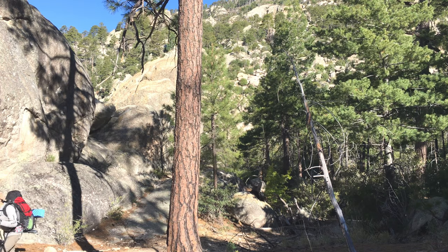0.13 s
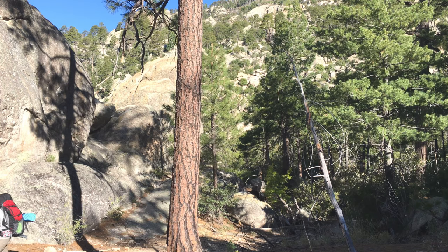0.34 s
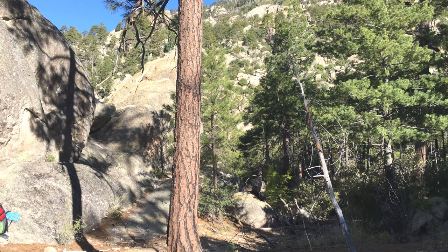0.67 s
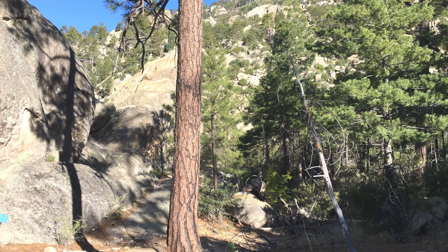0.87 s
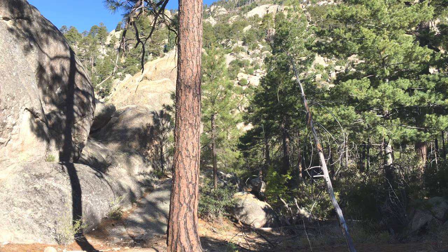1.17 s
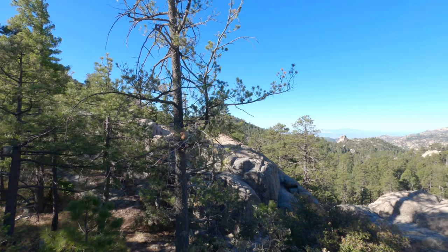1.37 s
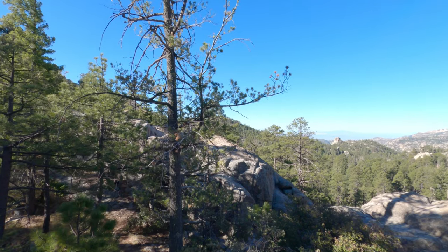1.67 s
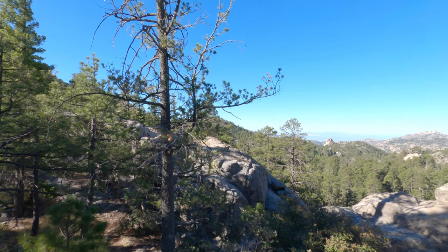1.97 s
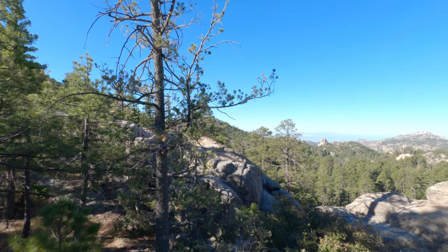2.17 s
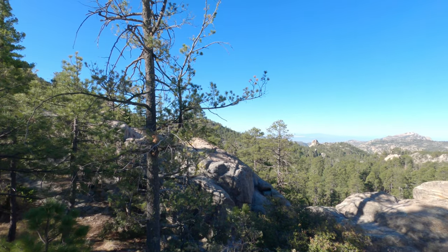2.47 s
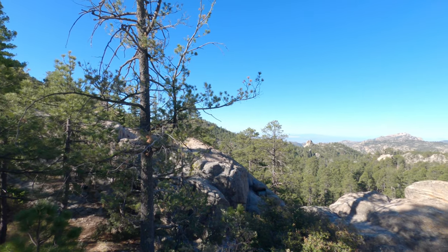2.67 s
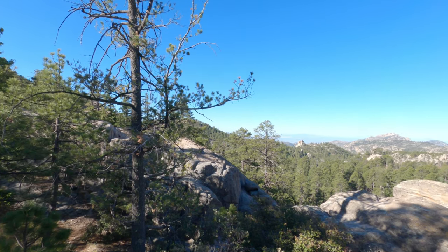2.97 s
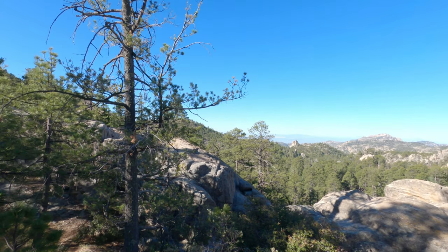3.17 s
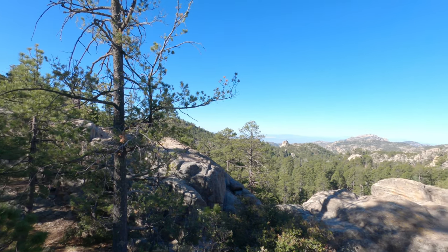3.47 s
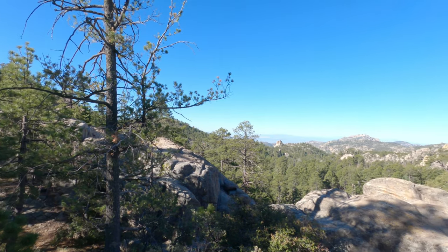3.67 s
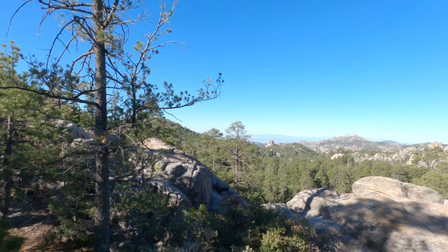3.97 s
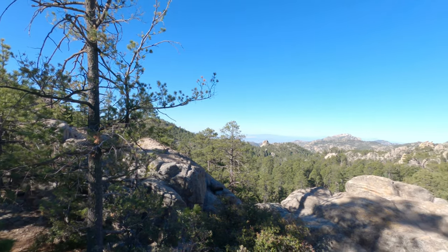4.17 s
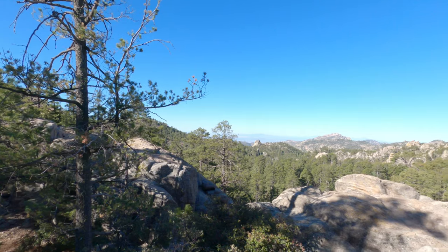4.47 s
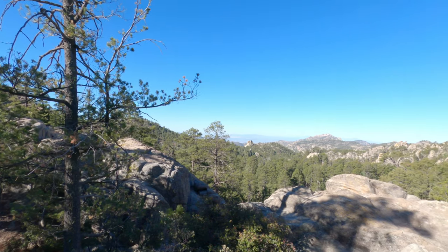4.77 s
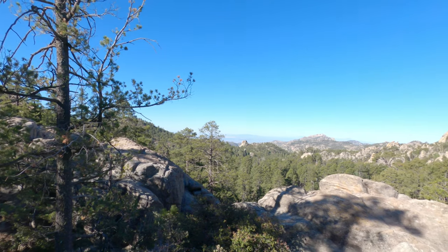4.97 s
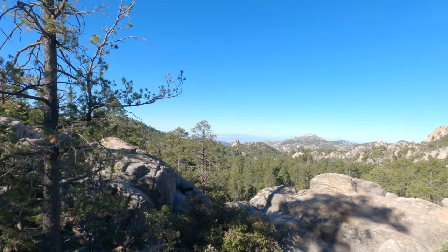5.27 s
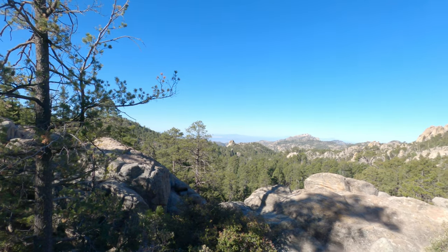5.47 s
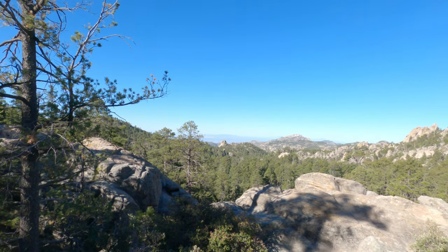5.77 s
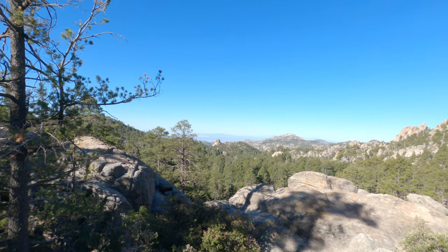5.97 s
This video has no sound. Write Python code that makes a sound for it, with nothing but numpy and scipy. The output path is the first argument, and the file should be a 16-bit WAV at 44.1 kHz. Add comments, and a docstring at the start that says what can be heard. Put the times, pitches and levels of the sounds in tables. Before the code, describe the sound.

A hand-held outdoor microphone catches soft grit crunching underfoot, small pebble snaps, rumbling bumps and breezy hiss for just over a second. The background then drops abruptly to a soft, dull canyon hush. Over it a small bird sings a long descending run of almost pure whistles, quick and high at first, later slower, lower and deeply scooped, finished by a quiet rough buzz. Rocks give quick echoes and a very faint tail.

```python
"""On a gritty trail two steps crunch and low bumps shake the hand-held microphone, then a cut to quieter canyon air.
A canyon wren whistles a long cascade of scooped notes, tones that drop, slide down and hook up; the notes
slow and sink in pitch, and the song ends on a nasal buzz of pulses. Thin slurs come from a far bird.
Rock echoes, pine scatter and a faint wall tail surround the birds; shaped noise makes grit, rumble and breeze."""
import sys
import numpy as np
from scipy import signal
from scipy.fft import rfft, irfft, next_fast_len
from scipy.io import wavfile
from scipy.ndimage import uniform_filter1d

SR = 44100
rng = np.random.default_rng(int(sys.argv[2]) if len(sys.argv) > 2 else 0)


def wav_out(sig):
    """Save sig, one row per channel (or a flat mono array), as 16-bit PCM at SR to the path in sys.argv[1]."""
    wavfile.write(sys.argv[1], SR, np.round(np.clip(np.atleast_2d(sig).T, -1, 1) * 32767).astype(np.int16))


N = 270112
T = np.arange(N) / SR   # time axis, s

# Wren notes, level before the song fader: start_s, downward_slide_s, held_top_hz, level_db
WREN_NOTES = [(1.102, .013, 5670, -47), (1.165, .023, 5380, -32.5), (1.247, .030, 5050, -28),
              (1.351, .039, 4770, -25.3), (1.472, .046, 4610, -23.3), (1.608, .052, 4520, -20.7),
              (1.756, .059, 4470, -19.2), (1.915, .067, 4370, -20), (2.084, .071, 4310, -18),
              (2.264, .077, 4210, -17.8), (2.452, .079, 4120, -19.3), (2.648, .081, 4010, -20),
              (2.843, .086, 3925, -20), (3.044, .088, 3780, -20.3), (3.248, .096, 3695, -20.8),
              (3.465, .099, 3620, -18.5), (3.685, .105, 3550, -18.3), (3.917, .110, 3455, -19),
              (4.154, .122, 3355, -19.7), (4.403, .124, 3295, -21.3), (4.647, .105, 3305, -22),
              (4.878, .103, 3305, -23.3), (5.109, .105, 3305, -22), (5.349, .106, 3300, -23)]
# Scoop, deepening along the song: time_s, depth_below_top_hz
SCOOP_DEPTH = [(1.1, 400), (1.18, 600), (1.5, 590), (2.3, 865), (3.05, 820), (4.15, 880), (4.4, 970),
               (4.65, 1700), (5.35, 1790)]
# Shape of the slide: time_s, knee_height (share of scoop), mid_height (share of knee)
SLIDE_SHAPE = [(1.25, .2, .4), (1.4, .8, .3), (2.05, .95, .43), (2.75, .5, .9), (3.15, .55, .85),
               (3.7, .57, .53), (4.4, .6, .46), (5.35, .66, .39)]
# Voice weakening as it dips below the top: time_s, loss_db_per_hz
DIP_LOSS = [(1.1, 0), (1.8, .0008), (2.5, .0045), (3.4, .0085), (3.8, .012), (4.3, .0105), (4.65, .0135)]
# Upward hook with its held top: time_s, length_s
HOOK_LENGTH = [(1.1, .018), (1.26, .041), (2.3, .05), (4.3, .051), (4.65, .063), (5.35, .066)]
# Swell into each note: time_s, onset_level_db
ONSET_LEVEL = [(1.47, -13), (1.6, -8), (2.4, -7), (2.8, -11), (3.05, -7), (3.5, -8), (4.3, -9), (4.65, -5)]
# Throat and beak resonance during the buzz: pitch_hz, level_db
THROAT_SPECTRUM = [(1000, -59), (1520, -26.5), (2040, -20.5), (2530, -35), (3050, -13), (3560, -15),
                   (4080, -5.5), (4600, -9.5), (5100, 0), (5620, -8), (6120, -11.5), (6650, -13.5),
                   (7700, -26), (8600, -40)]
# Faint slurs of a far bird: start_s, length_s, from_hz, to_hz, level_db
FAR_SLURS = [(0.083, 0.04, 4700, 3600, -75), (0.236, .045, 4900, 3800, -73),
             (0.284, 0.029, 4370, 4950, -75), (0.35, .04, 4700, 3860, -69)]
# Echoes off nearby rock faces: delay_left_s, delay_right_s, level_db
ROCK_ECHOES = [(.0016, .0016, -26.5), (.005, 0.0032, -17), (.012, .0121, -17), (.0226, .0227, -20.5),
               (.0338, .0365, -29)]
# Left-right balance of the birds, positive to the left: time_s, balance_db
BIRD_BEARING = [(1.1, .6), (2.2, 1.8), (3.2, 3.1), (5.55, 3), (5.66, -.3)]
# Boots pressing and scuffing the grit: start_s, level_db, fade_to_1/e_s
BOOT_SCUFFS = [(0, -58.5, .16), (.37, -46.5, .05), (.415, -49.5, .02), (.465, -51, .1), (.855, -54, .27),
               (1.055, -54.5, .05), (1.2, -58, .3)]
# Pebbles and twigs that snap, before the snap trim: start_s, level_db
PEBBLE_SNAPS = [(0.387, -37), (.428, -53), (.473, -51), (.49, -60), (0.561, -41), (0.861, -36.5),
                (1.061, -39), (1.071, -39.5), (4.71, -44)]
# Relative spectrum of grit: pitch_hz, level_db (per hz)
GRIT_SPECTRUM = [(150, -8.5), (330, 3), (800, 0.5), (1900, -2), (2900, -7.5), (4400, -15.5), (5800, -8.5),
                 (8000, -20), (10000, -19), (15000, -24.5)]
# Low bumps on the microphone, before gain and filter: middle_s, level_db, pitch_hz
MIC_BUMPS = [(.152, -26, 63), (0.185, -30.5, 120), (.278, -41, 74.5), (.356, -33.5, 130),
             (.474, -27.5, 63.3), (.547, -28.5, 139), (0.554, -20.5, 67), (.651, -21, 60),
             (0.77, -31, 67.5), (0.79, -30.5, 134), (0.847, -29, 60), (0.885, -26.5, 91),
             (0.973, -22.5, 113), (.991, -19.5, 60), (1.068, -26.5, 75.6), (1.141, -36.5, 71),
             (1.212, -45, 93), (1.351, -37, 55)]
# Hand shifting on the microphone: middle_s, half_length_s, level_db
GRIP_SHIFTS = [(2.55, .055, -62), (3.0, .018, -63), (6.07, .05, -58)]
# Relative spectrum of the air on the trail: pitch_hz, level_db (per hz)
TRAIL_AIR_SPECTRUM = [(25, 15), (55, 26), (120, 8.5), (220, 5), (400, -2), (900, -3), (1500, -12.5),
                      (2500, -17), (4500, -15.5), (7000, -22.5), (10000, -22), (15500, -29)]
# Relative spectrum of the air over the canyon: pitch_hz, level_db (per hz)
CANYON_AIR_SPECTRUM = [(25, -2), (60, -1.5), (100, -19), (150, 6.5), (250, 3), (500, 0.5), (1200, 0),
                       (1900, -13.5), (3000, -22.5), (5000, -22.5), (7000, -28.5), (10000, -37),
                       (15000, -47)]
# Left-right likeness of the canyon air: pitch_hz, likeness (0 to 1)
AIR_LIKENESS = [(100, .4), (280, .48), (1000, .62), (4000, .8), (12000, .55)]
# Left-right balance of the canyon air, positive to the left: pitch_hz, balance_db
AIR_BALANCE = [(60, 0), (220, -1.5), (700, -.5), (1500, .3), (4000, .5), (9000, -.5), (15000, -3)]

ATTACK_S, RELEASE_S = .006, .016   # edges of each whistled note
BUZZ_HZ, BUZZ_DB = 511.5, -37   # pulse rate before bends, level at the crest before the buzz fader
BUZZ_START_S, BUZZ_CREST_S, BUZZ_BREAK_S, BUZZ_END_S = 5.664, 5.79, 5.88, 6.016
PORT_LAG_S = .000017   # the left microphone port hears the birds this much later
SCUFF_RISE_S = .018
CUT_S = 1.376   # middle of the cut from trail to canyon background
TRAIL_DB, CANYON_DB = -47, -61   # air levels
TRAIL_RUMBLE_DB, CANYON_RUMBLE_DB = -52, -85   # the canyon rumble lies under the trail rumble too
CUTOFF_HZ = 15700


def cascade(onset_hz=5250, least_drop_hz=300, crest_hz=80, knee_share=.18, mid_share=.56, dwell_share=.08,
            rise_s=.023, settle_s=.0068, knee_softness=.28, hold_fade_db=-4.5, strained_hz=2100, relaxed=-.4,
            overtones_floor_db=-2.2, turn_dip_db=-2.5, turn_dip_s=.013, strain_overtones_db=1.2,
            attack_overtones_db=7, hook_overtones_db=-9, bite_s=.04, waver=.0065, flutter_db=1.65):
    """Each note drops to a knee, slides to a turn and hooks up; returns pitch, amplitude, overtone boost (dB)."""
    pitch, level, overtones_db = np.full(N, 3000.), np.zeros(N), np.zeros(N)
    for start, fall, top_hz, db in WREN_NOTES:
        depth, = at_time(SCOOP_DEPTH, start)
        knee_height, mid_height = at_time(SLIDE_SHAPE, start)
        loss, = at_time(DIP_LOSS, start)
        onset_db, = at_time(ONSET_LEVEL, start)
        hook_s, = at_time(HOOK_LENGTH, start)
        turn = start + fall
        end = turn + hook_s
        knee, mid = start + knee_share * fall, start + mid_share * fall
        top = turn + min(rise_s, hook_s / 2)
        span = (T >= start) & (T < end)
        t = T[span]

        low_hz, knee_above = top_hz - depth, knee_height * depth
        drop_hz = max(onset_hz - low_hz - knee_above, least_drop_hz)
        drop = drop_hz * np.exp(-((t - start) / settle_s) ** 1.25)
        slide_times = [knee, mid, turn - dwell_share * fall]
        slide = np.interp(t, slide_times, [knee_above, mid_height * knee_above, 0])
        slide = uniform_filter1d(slide, size=300)
        rising = ease((t - turn) / (top - turn))
        held = np.clip((t - top) / (end - top), 0, 1)
        crest = crest_hz * (np.sin(np.pi * held) - .5 * rising)   # the held top arches over
        pitch[span] = low_hz + drop + slide + depth * rising ** 2 + crest

        # a long drop bites at the attack and tires on the hook; strain scales these dB settings
        strain = np.interp(drop_hz, [least_drop_hz, strained_hz], [relaxed, 1])
        bite_db = attack_overtones_db * np.exp(-(t - start) / bite_s)
        strained_db = strain_overtones_db + bite_db + hook_overtones_db * rising
        overtones_db[span] = overtones_floor_db + strain * strained_db

        swell_db = onset_db * np.interp(t, [start, knee, mid], [1, knee_softness, 0])
        dip_db = -loss * (depth - slide) * (1 - rising)
        # the voice eases off before it turns
        dip_db = dip_db + turn_dip_db * np.exp(-((t - turn) / turn_dip_s + 1) ** 2)
        edges = ease((t - start) / ATTACK_S) * ease((end - t) / RELEASE_S)
        level[span] = from_db(db + swell_db + dip_db + strain * hold_fade_db * held) * edges
    return pitch * (1 + waver * drift(120)), level * from_db(flutter_db * drift(47)), overtones_db


def whistle(pitch, level, overtones_db, overtone_flutter_db=3.8):
    """A nearly pure tone whose two overtones leak most on low pitches, varied by the boost and a flutter."""
    phase = 2 * np.pi * np.cumsum(pitch) / SR
    leak = from_db(overtones_db + overtone_flutter_db * drift(71))
    # each curve: pitch_hz, level_db
    second = from_db(at_hz([(1500, -3), (2000, -11), (2550, -25), (3200, -27.5), (3450, -38.5),
                            (3750, -41), (4400, -45), (5200, -54)], pitch))
    third = from_db(at_hz([(1500, -19), (2000, -31), (2350, -47), (2750, -60), (3400, -58),
                           (4200, -48), (5000, -64)], pitch))
    # the voice is a little weaker around 1900 Hz
    carry = from_db(at_hz([(1500, -1.5), (1900, -4.5), (2300, -1.5), (2700, -.5), (4500, 0), (5400, 1)], pitch))
    overtones = second * np.sin(2 * phase) + third * np.sin(3 * phase)
    return np.sqrt(2) * level * carry * (np.sin(phase) + leak * overtones)


def buzz_arch(scoop_hz=52, scoop_s=.024, sag_hz=34, collapse_hz=55, collapse_s=.013, swell_db=-5, sag_db=-2.5,
              attack_s=.012, release_s=.022, steady_rough=.37, broken_rough=.27, break_s=.03):
    """The buzz scoops up, roughens, sags and collapses; returns pulse rate, amplitude and roughness."""
    t = np.clip(T, BUZZ_START_S, BUZZ_END_S)
    since, left = t - BUZZ_START_S, BUZZ_END_S - t
    early = np.maximum((BUZZ_CREST_S - t) / (BUZZ_CREST_S - BUZZ_START_S), 0) ** 2
    sag = np.maximum((t - BUZZ_CREST_S) / (BUZZ_END_S - BUZZ_CREST_S), 0) ** 2
    scoop = scoop_hz * np.exp(-since / scoop_s)
    collapse = collapse_hz * np.exp(-left / collapse_s)
    rate = BUZZ_HZ - scoop - sag_hz * sag - collapse
    level = from_db(BUZZ_DB + swell_db * early + sag_db * sag) * ease(since / attack_s) * ease(left / release_s)
    return rate, level, steady_rough + broken_rough * ease((t - BUZZ_BREAK_S) / break_s)


def buzz(ripple_db=2.5, ripple_hz=62, jitter=.0089, shimmer_db=3.0, rasp_db=-8, partial_flutter_db=4.0,
         partial_slip=1.0, sweep=.13):
    """Each pulse of the syrinx is a tiny downward chirp with a puff of noise; roughness scales the unsteadiness."""
    rate, level, rough = buzz_arch()
    phase = 2 * np.pi * np.cumsum(rate * (1 + jitter * rough * drift(230))) / SR
    pulses = np.zeros(N)
    for k in range(2, 18):
        # high partials come first in each pulse
        lead = np.pi * sweep * k ** 2 + partial_slip * rough * drift(60)
        partial_db = at_hz(THROAT_SPECTRUM, k * rate) + partial_flutter_db * rough * drift(45)
        pulses += from_db(partial_db) * np.cos(k * phase + lead)
    pulses /= np.sqrt(uniform_filter1d(pulses ** 2, size=1200))   # even out the running level
    puffs = rng.standard_normal(N) * (1 + .5 * np.cos(phase))
    rasp = colour(puffs, [(1500, -47), (2800, -7), (4000, -19), (5200, 5), (6500, -13), (7700, -20),
                          (8600, -24), (10000, -28), (10700, -73)])
    # a 62 Hz ripple in loudness, as from overlapping echoes
    ripple = ripple_db * np.sin(2 * np.pi * ripple_hz * T + drift(15))
    unsteady = from_db(rough * (ripple + shimmer_db * drift(130)))
    return level * unsteady * (pulses + rough * from_db(rasp_db) * rasp)


def far_bird():
    """Thin whistles from far off, each a sine gliding between two pitches under a rounded swell."""
    out = np.zeros(N)
    for start, length, from_hz, to_hz, db in FAR_SLURS:
        u = np.clip((T - start) / length, 0, 1)
        phase = 2 * np.pi * np.cumsum(from_hz + (to_hz - from_hz) * u) / SR
        out += from_db(db) * np.sqrt(2) * np.sin(np.pi * u) ** 2 * np.sin(phase)
    return out


def scatter(x, delay_s, t60, side_db, echoes_per_s=1500):
    """A dying swarm of small random echoes; its middle part has unit energy, its side part sits at side_db."""
    t = T[:SR]
    fade = np.clip(t / delay_s - .5, 0, 1) * from_db(-60 * t / t60)
    echoes = rng.standard_normal((2, SR)) * (rng.random((2, SR)) < echoes_per_s / SR) * fade
    mid, side = echoes / np.sqrt(np.sum(echoes ** 2, axis=1, keepdims=True))
    response = mid + from_db(side_db) * side * [[1], [-1]]
    return signal.fftconvolve(x[None], response, axes=1)[:, :N]


def canyon(x, trees_db=-10.3, walls_db=-26):
    """Direct sound, quick echoes off nearby rock, scatter from the pines and a faint tail from the walls."""
    rocks = sum(from_db(db) * np.array([delayed(x, left_s), delayed(x, right_s)])
                for left_s, right_s, db in ROCK_ECHOES)
    trees = scatter(x, delay_s=.0054, t60=.2, side_db=-5, echoes_per_s=900)
    walls = scatter(x, delay_s=.045, t60=.55, side_db=-6, echoes_per_s=300)
    left, right = x + rocks + from_db(trees_db) * trees + from_db(walls_db) * walls
    # a phase tilt delays the left port by less than a sample
    lag = np.exp(-2j * np.pi * np.fft.rfftfreq(N, 1 / SR) * PORT_LAG_S)
    left = irfft(rfft(left) * lag, N)
    pan_db, = at_time(BIRD_BEARING, T)
    return np.array([left, right]) * from_db(pan_db * [[.5], [-.5]])


def tread():
    """Weight of the boots on the grit: each scuff comes on quickly and dies away; their powers add."""
    power = np.zeros(N)
    for start, db, fade_s in BOOT_SCUFFS:
        since = T - start
        fade = np.exp(-np.maximum(since - SCUFF_RISE_S, 0) / fade_s)
        power += (from_db(db) * ease(since / SCUFF_RISE_S) * fade) ** 2
    return np.sqrt(power) * (1 - after_cut())


def footsteps(grains_per_s=3500, size_db=4.0, snap_s=.0048, snap_db=-8):
    """Grit gives way in countless tiny slips under the boot, and a few pebbles snap as short noise bursts."""
    born = rng.random((2, N)) < grains_per_s / SR
    sizes = from_db(size_db * np.minimum(rng.exponential(1, (2, N)), 4))
    grains = born * rng.choice([-1, 1], (2, N)) * sizes
    snaps = sum(from_db(db + snap_db) * (T >= s) * np.exp(-np.abs(T - s) / snap_s) for s, db in PEBBLE_SNAPS)
    crunch = tread() * colour(ahead(grains), GRIT_SPECTRUM)
    return crunch + snaps * colour(ahead(rng.standard_normal((2, N))), GRIT_SPECTRUM)


def handling():
    """Strength of the hand's rumble: strong on the trail, very faint after the cut, with swells as the grip shifts."""
    shifts = sum(from_db(db) * np.exp(-((T - s) / half_s) ** 2) for s, half_s, db in GRIP_SHIFTS)
    return shifts + from_db(TRAIL_RUMBLE_DB) * (1 - after_cut()) + from_db(CANYON_RUMBLE_DB)


def bumps(cycles=.43, top_hz=360):
    """Heavily damped pushes and pulls of pressure over a soft rumble, the same in both channels."""
    swings = np.zeros(N)
    for middle, db, hz in MIC_BUMPS:
        t = T - middle
        damping = np.exp(-np.minimum(np.abs(t) * hz / cycles, 20))
        swings += -1.4 * from_db(db) * np.sin(2 * np.pi * hz * t) * damping
    rumble = colour(rng.standard_normal(N), [(15, -5.5), (40, -1), (70, -19), (150, -17), (500, -70.5)])
    band = signal.butter(2, [28, top_hz], "band", fs=SR, output="sos")
    return signal.sosfiltfilt(band, swings) + handling() * rumble


def air():
    """Breeze in the pines as shaped noise: rumbling and hissy on the trail, soft and dull over the canyon."""
    canyon_share = after_cut()
    trail = from_db(TRAIL_DB) * colour(ahead(rng.standard_normal((2, N))), TRAIL_AIR_SPECTRUM)
    overlook = from_db(CANYON_DB) * colour(widen(rng.standard_normal((2, N))), CANYON_AIR_SPECTRUM)
    return (1 - canyon_share) * trail + canyon_share * overlook


def after_cut():
    """0 before the cut, 1 after, with a 4 ms crossfade."""
    return np.clip((T - CUT_S) / .004 + .5, 0, 1)


def ahead(pair, side_db=-26):
    """Two unrelated signals become a sound straight ahead, nearly the same in both channels."""
    return pair[0] + from_db(side_db) * pair[1] * np.array([[1], [-1]])


def widen(pair):
    """Two unrelated signals become left and right in the open air, partly alike."""
    hz = np.fft.rfftfreq(N, 1 / SR)
    alike = np.clip(at_hz(AIR_LIKENESS, hz), 0, 1)
    mid, side = rfft(pair)
    sign = np.array([[1], [-1]])
    spread = np.sqrt(1 + alike) * mid + np.sqrt(1 - alike) * side * sign
    return irfft(spread * from_db(sign * at_hz(AIR_BALANCE, hz) / 2), N)


def delayed(x, seconds):
    """The same sound, later."""
    return np.interp(T - seconds, T, x, left=0)


def drift(rate):
    """Slow chance with spread 1, weaker above the rate in Hz, drawn at every 16th sample."""
    size = next_fast_len(N // 16 + 1)
    f = np.fft.rfftfreq(size, 16 / SR)
    slow = rms_one(irfft(rfft(rng.standard_normal(size)) / (1 + (f / rate) ** 2), size))
    return np.interp(np.arange(N) / 16, np.arange(size), slow)


def colour(x, spectrum):
    """Give a signal a spectrum; rms 1."""
    gain = from_db(at_hz(spectrum, np.fft.rfftfreq(N, 1 / SR)))
    return rms_one(irfft(rfft(x) * gain, N))


def at_hz(points, hz):
    """Read a spectrum on a log-frequency axis."""
    f, value = np.transpose(points)
    return np.interp(np.log(np.maximum(hz, 1)), np.log(f), value)


def at_time(rows, s):
    """Each column of a curve at the given time."""
    times, *columns = np.transpose(rows)
    return [np.interp(s, times, c) for c in columns]


def ease(u):
    """A quarter-sine step from 0 to 1."""
    return np.sin(np.pi / 2 * np.clip(u, 0, 1))


def from_db(db):
    """Decibels to gain."""
    return 10 ** (np.asarray(db) / 20)


def rms_one(x):
    """Scale to rms 1."""
    return x / np.sqrt(np.mean(x ** 2) + 1e-20)


def scene(whistle_db=-2.61, buzz_db=.43):
    """The birds through the canyon; boots, bumps and air close by."""
    song = from_db(whistle_db) * whistle(*cascade()) + from_db(buzz_db) * buzz()
    return canyon(song + far_bird()) + footsteps() + bumps() + air()


def record(dry):
    """A steep low-pass filter cuts the top."""
    return signal.sosfilt(signal.ellip(10, .1, 80, CUTOFF_HZ, fs=SR, output="sos"), dry)


dry = scene()
out = record(dry)
wav_out(out)
```